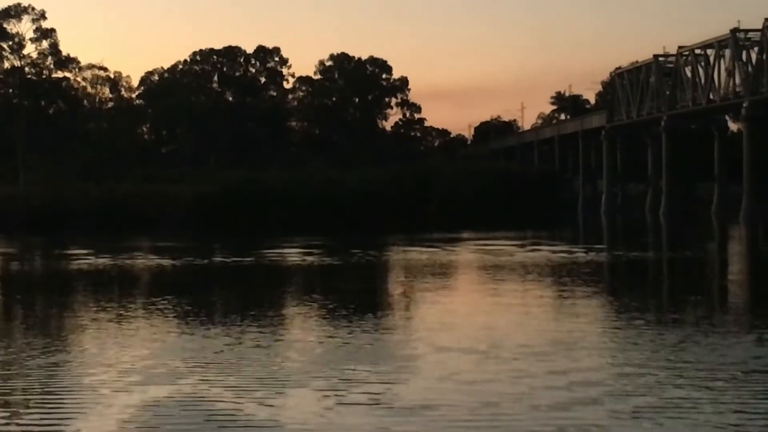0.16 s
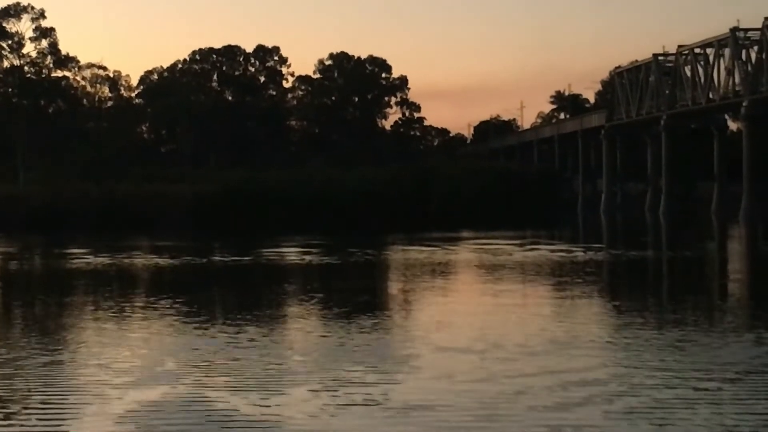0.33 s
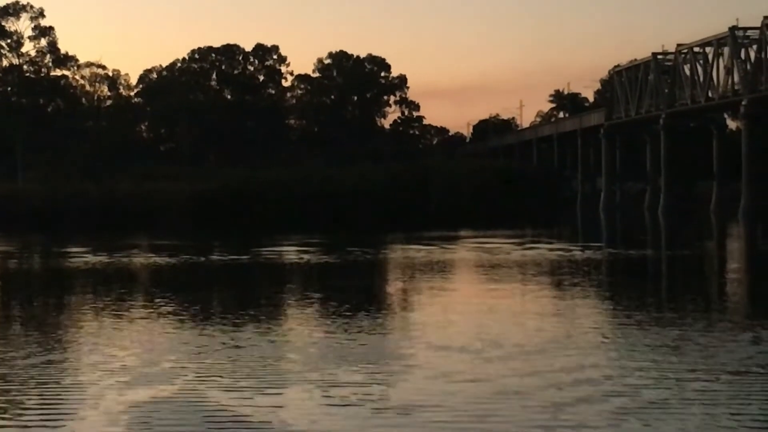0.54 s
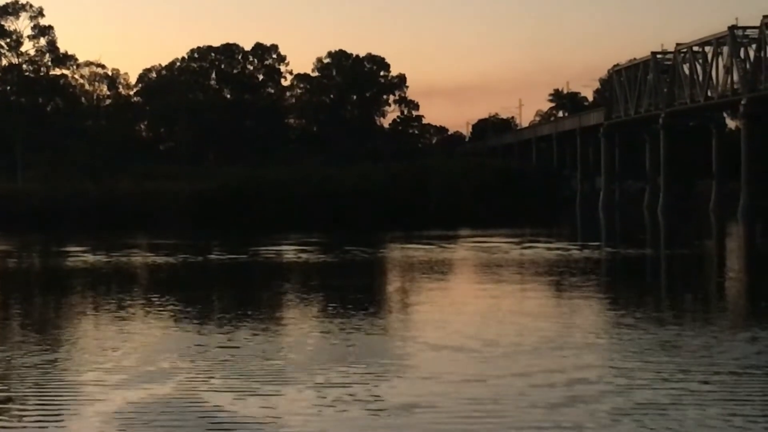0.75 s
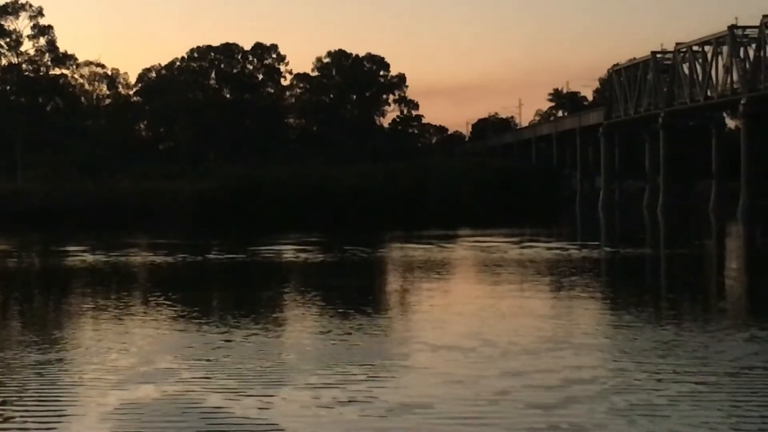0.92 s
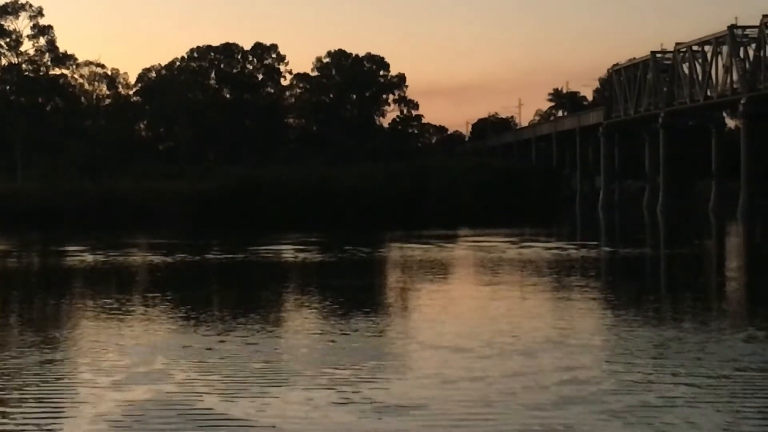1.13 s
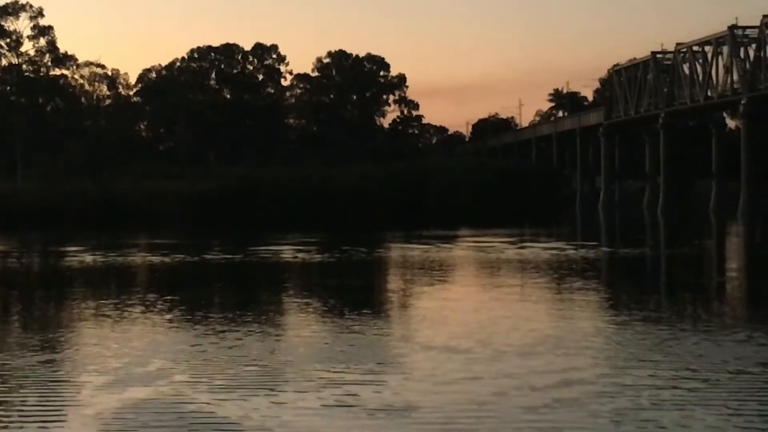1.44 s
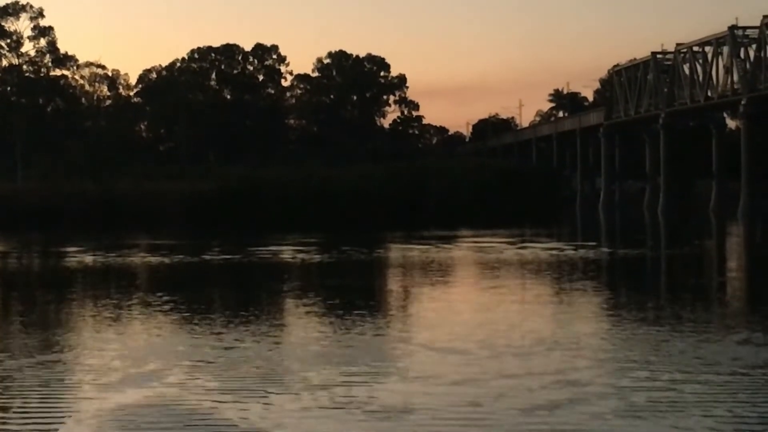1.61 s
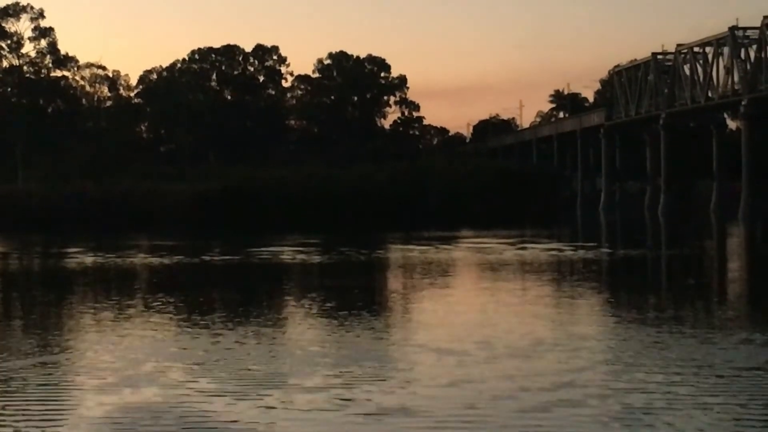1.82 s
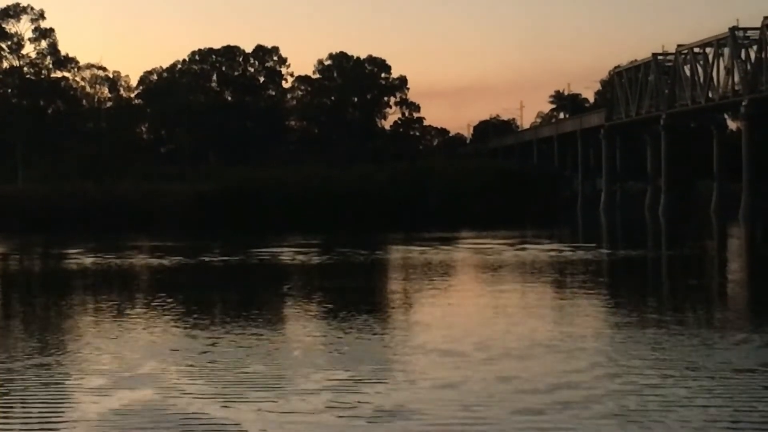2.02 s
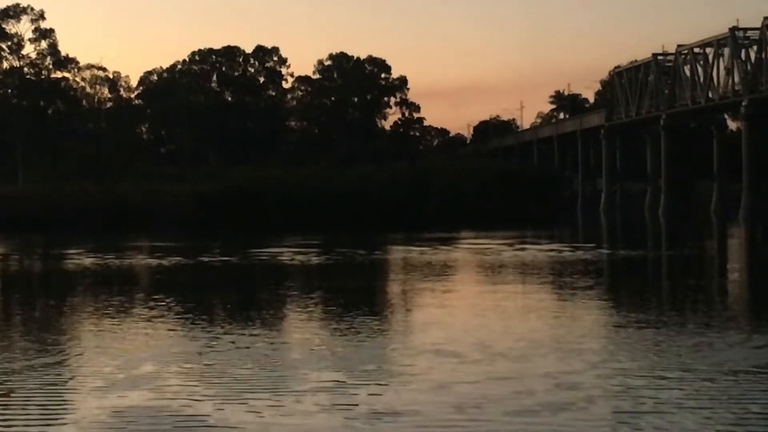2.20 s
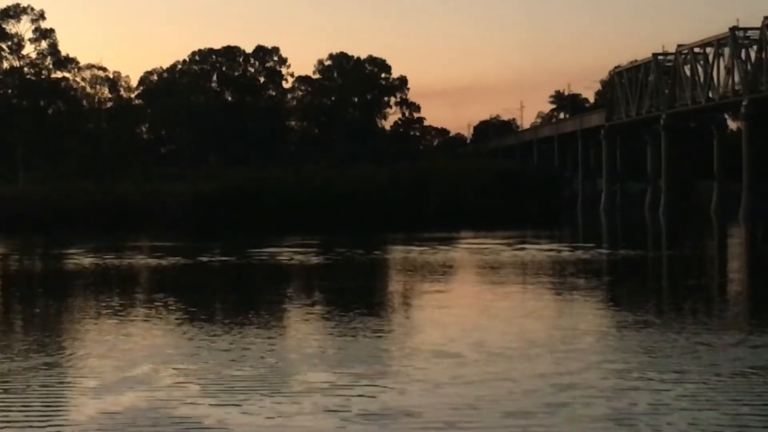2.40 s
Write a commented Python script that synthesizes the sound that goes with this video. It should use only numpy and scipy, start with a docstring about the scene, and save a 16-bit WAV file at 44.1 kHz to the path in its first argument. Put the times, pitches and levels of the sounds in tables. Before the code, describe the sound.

A flock of small parrots chatters and twitters in riverside trees over a low distant traffic rumble.

```python
"""Small parrots chatter in trees across a river at dusk: gliding chirps and a few harsh rasps, close up.
The nearer birds are whistled syllables with overtones; each chirp has a quick reflection.
Farther back the rest of the roost blurs: many random chirps mixed with their own echoes.
The trees scatter every call as decaying, dulled noise echoes.
Underneath, distant traffic is shaped noise with a wavering engine drone and two brief low swells."""
import sys
import numpy as np
from scipy import signal
from scipy.fft import rfft, irfft
from scipy.io import wavfile

SR = 44100
rng = np.random.default_rng(int(sys.argv[2]) if len(sys.argv) > 2 else 0)


def inscribe(sig):
    """Save sig as 16-bit PCM at rate SR to the path in sys.argv[1].

    A 1-D sig is mono; a 2-D sig holds one channel per row.
    Samples are clipped to [-1, 1] before scaling.
    """
    pcm = np.round(np.clip(np.atleast_2d(sig).T, -1, 1) * 32767)
    wavfile.write(sys.argv[1], SR, pcm.astype(np.int16))


N = 112454  # samples, about 2.55 s

# Near chirps: start t/s, length t/s, pitch f/Hz at the start, one third, two thirds and the end,
# then level/dB of each strong harmonic from the first up, before CHIRP_DB
NEAR_CHIRPS = [(.110, .034, 3750, 4200, 4250, 4150, -53.5), (.120, .048, 4550, 4750, 4830, 4700, -55.5),
               (.158, .024, 2780, 2850, 2970, 3060, -56, -56.5, -69),
               (.180, .040, 4750, 4830, 4700, 4550, -57.5),
               (.186, .044, 3290, 3400, 3410, 3380, -51.5, -62.5, -74),
               (.231, .058, 3450, 3740, 3800, 3850, -50.5, -68, -74),
               (.281, .030, 4720, 4650, 4610, 4580, -52, -69), (.376, .026, 4650, 4520, 4470, 4420, -56.5),
               (.411, .068, 1680, 1680, 1640, 1650, -66, -64, -66, -69),
               (.485, .028, 3650, 3750, 3800, 3830, -54.5, -74),
               (.510, .017, 3450, 3370, 3310, 3330, -56, -63), (.525, .025, 4600, 4430, 4300, 4180, -51),
               (.605, .098, 2910, 2950, 2930, 3200, -61.5, -67),
               (.644, .054, 4520, 4150, 3830, 3980, -55.5), (.696, .030, 4150, 4500, 4510, 4250, -51),
               (.722, .060, 3720, 3470, 3480, 3850, -60, -76), (1.019, .028, 4230, 4400, 4350, 4150, -52),
               (1.036, .030, 3250, 3250, 3130, 2900, -58, -69),
               (1.051, .030, 4200, 4150, 4060, 4150, -50.5), (1.078, .030, 4200, 4400, 4370, 4150, -52),
               (1.100, .028, 2670, 2730, 2770, 2780, -65, -61),
               (1.102, .076, 3450, 3430, 3480, 3560, -53.5, -72),
               (1.122, .047, 3130, 3140, 3080, 2850, -64, -60, -70),
               (1.151, .022, 4500, 4530, 4500, 4400, -53), (1.180, .070, 3220, 3300, 3380, 3650, -55, -68),
               (1.193, .073, 4520, 4310, 4440, 4550, -51), (1.265, .069, 3450, 3540, 3700, 3950, -54, -70),
               (1.350, .032, 2720, 2740, 2880, 3000, -66, -65),
               (1.381, .072, 3230, 3240, 3530, 3400, -54.5, -65.5),
               (1.438, .034, 3350, 3380, 3460, 3420, -57, -59.5),
               (1.472, .042, 3450, 3290, 3540, 3600, -55, -62), (1.508, .042, 4330, 4500, 4600, 4560, -57),
               (1.527, .040, 2550, 2750, 2950, 3050, -60, -68), (1.567, .026, 4500, 4330, 4270, 4200, -53),
               (1.568, .042, 2810, 2830, 2930, 2900, -62, -63.5),
               (1.598, .030, 3450, 3720, 3780, 3600, -57, -74),
               (1.625, .044, 3450, 2820, 2720, 3150, -62, -60),
               (1.667, .042, 3280, 3430, 3480, 3570, -55, -63.5),
               (1.707, .059, 3800, 3880, 3660, 4020, -52, -73),
               (1.712, .105, 2800, 3070, 3250, 3450, -60, -64), (1.760, .032, 4650, 4600, 4450, 4400, -52),
               (1.830, .020, 4450, 4430, 4380, 4300, -54), (1.878, .057, 3230, 3350, 3630, 3800, -61, -68),
               (1.901, .106, 2500, 2690, 2990, 3600, -62, -59.5),
               (2.007, .036, 3800, 3600, 3350, 3330, -53), (2.022, .055, 3280, 3350, 3450, 3480, -61, -70),
               (2.152, .040, 4750, 4520, 4330, 4200, -51), (2.152, .056, 3000, 3050, 3200, 3220, -60, -65),
               (2.174, .044, 3400, 3530, 3490, 3680, -54, -66), (2.196, .046, 4500, 4820, 4850, 4650, -53),
               (2.225, .058, 2520, 2560, 2850, 3280, -66, -62),
               (2.237, .032, 3550, 3520, 3510, 3550, -56, -63), (2.268, .028, 3850, 4020, 3980, 3900, -54),
               (2.287, .090, 3270, 3390, 3440, 3400, -57.5, -68),
               (2.379, .056, 3280, 3260, 3290, 3370, -56, -57), (2.405, .056, 3780, 3900, 3970, 3850, -55),
               (2.430, .066, 4520, 4760, 4780, 4680, -57.5),
               (2.445, .066, 3520, 3500, 3600, 3850, -56, -70)]
# Near rasps: start t/s, length t/s, first pitch f/Hz, last pitch f/Hz, level/dB, overtone level/dB if strong
NEAR_RASPS = [(.068, .052, 3100, 2950, -58, -65), (.135, .026, 3080, 3330, -60, -66),
              (.236, .028, 4750, 4650, -57), (.328, .062, 3400, 2800, -57, -65.5),
              (.948, .034, 4030, 4250, -55), (.934, .05, 2710, 2835, -62, -70),
              (1.852, .042, 4000, 4450, -56), (2.085, .066, 2850, 2680, -61, -61),
              (2.143, .035, 3950, 4400, -54.5, -72), (2.331, .047, 4400, 4520, -55),
              (2.39, .04, 3080, 2960, -58, -62), (2.475, .042, 4420, 4330, -55)]
# Loudness course of the far flock: t/s, level/dB
FLOCK_COURSE = [(0, -57.5), (.2, -53), (.5, -55), (.82, -59.5), (.95, -57.5), (1.4, -58.5), (1.7, -52.5),
                (1.98, -57.5), (2.2, -51.5), (2.55, -56.5)]
# Change of a far call's overtone, fading toward the treble: overtone f/Hz, level/dB added to FLOCK_OVERTONE_DB
OVERTONE_FADE = [(6500, 6), (7600, -12), (9400, -12)]
# Spectrum shape of traffic rumble, open air and faint hiss: f/Hz, relative level/dB per Hz
AIR_SPECTRUM = [(15, -14), (35, -1), (80, -1), (110, -8), (220, -12), (300, -17), (480, -24), (900, -20),
                (1500, -24), (2100, -28), (4400, -29), (5200, -39), (7000, -45.5), (8000, -47),
                (15500, -50)]
# Wavering engine drone: f/Hz, level/dB
ENGINE_DRONE = [(76, -55.5), (139, -62.5), (210, -65)]
# Brief low swells in the rumble: centre t/s, width t/s, peak level/dB
LOW_SWELLS = [(1.045, 0.017, -48), (1.99, 0.054, -52.5)]

CHIRP_DB = 1.0  # gain on every near chirp
BOUNCE_DB, BOUNCE_S = -9, .0045  # first reflection of each chirp, from water or branches: level, mean delay
ATTACK_S, RELEASE_S = .008, .0079
OVERHANG_S = .002  # extra sound before and after a syllable's stated length
CHIRP_JITTER, CHIRP_JITTER_HZ = .008, 290  # random pitch unsteadiness (share of pitch) and its speed
RASP_JITTER, RASP_JITTER_HZ = .052, 800  # the same, large and fast enough to sound harsh
WARBLE, WARBLE_HZ = .0048, 55.1  # regular pitch warble (share of pitch) and its rate
FLUTTER_DB, FLUTTER_HZ = 2.4, 150  # loudness unsteadiness and its speed
FAINT_DB = -29  # the next harmonic above a call's strong ones, relative to the last of them
WANDER_SIZE = 8192  # samples of random motion drawn per syllable, longer than any syllable

FLOCK_CALLS, FLOCK_CALL_S = 130, .043  # number of far calls and their mean length
FLOCK_HZ, FLOCK_SPREAD, FLOCK_GLIDE = 3470, .105, .05  # middle pitch; log-pitch spread of calls and glides
FLOCK_OVERTONE_DB, FLOCK_JITTER = -15.5, .016
FLOCK_RANGE_DB = 7.5  # the faintest far calls lie this much below the loudest
FLOCK_DIRECT = .75  # gain of direct sound beside echoes at gain 1
ECHO_DB, ECHO_T60_S, ECHO_DELAY_S, ECHO_CUT_HZ = -9.5, .4, .0061, 6500  # ECHO_DB is for near birds

AIR_DB = -47.5  # overall level of the shaped noise
DRONE_WIDTH_HZ = 8.4  # speed of the drone's wavering
SWELL_HZ = 205.6
EDGE_HZ = 15700


def near_birds():
    """Clear chirps and harsh rasps from the nearest trees, overlapping freely."""
    return near_chirps() + near_rasps()


def near_chirps():
    """Gliding whistles, each followed by a weaker copy that took a slightly longer path."""
    out = np.zeros(N)
    for start, length, a, b, c, d, *levels_db in NEAR_CHIRPS:
        chirp = amp(CHIRP_DB) * call(length, [a, b, c, d], levels_db, CHIRP_JITTER, CHIRP_JITTER_HZ)
        add(out, start - OVERHANG_S, chirp)
        bounce_delay = BOUNCE_S * (.5 + rng.random())
        add(out, start - OVERHANG_S + bounce_delay, amp(BOUNCE_DB) * chirp)
    return out


def near_rasps():
    """Straight glides whose fast, random pitch jitter roughens the whistle."""
    out = np.zeros(N)
    for start, length, first, last, *levels_db in NEAR_RASPS:
        rasp = call(length, [first, last], levels_db, RASP_JITTER, RASP_JITTER_HZ)
        add(out, start - OVERHANG_S, rasp)
    return out


def call(length, pitches, levels_db, jitter, jitter_hz):
    """One syllable: an unsteady whistle that glides through its pitches, with overtones."""
    t = np.arange(0, length + 2 * OVERHANG_S, 1 / SR)
    # A polynomial through the evenly spaced pitches gives a smooth glide
    glide = np.polyfit(np.linspace(0, 1, len(pitches)), pitches, len(pitches) - 1)
    hz = np.polyval(glide, np.clip((t - OVERHANG_S) / length, 0, 1))
    warble = WARBLE * np.sin(2 * np.pi * (WARBLE_HZ * t + rng.random()))
    unsteadiness = jitter * wander(jitter_hz, WANDER_SIZE)[:len(t)]
    phase = 2 * np.pi * np.cumsum(hz * (1 + warble + unsteadiness)) / SR

    ramp = np.clip(np.minimum(t / ATTACK_S, (t[-1] - t) / RELEASE_S), 0, 1)
    gate = np.sin(np.pi / 2 * ramp) ** 2
    flutter = unit(amp(FLUTTER_DB * wander(FLUTTER_HZ, WANDER_SIZE)[:len(t)]))

    harmonics_db = [*levels_db, levels_db[-1] + FAINT_DB]
    tone = sum(amp(db) * np.sin(k * phase) for k, db in enumerate(harmonics_db, start=1))
    return np.sqrt(2) * gate * flutter * tone  # sqrt(2) makes the levels rms


def trees(x):
    """Scattered echoes from trunks and leaves: a decaying noise tail, dulled in the treble."""
    t = np.arange(SR // 2) / SR
    decay = amp(-60 * t / ECHO_T60_S)
    onset = np.clip(t / ECHO_DELAY_S - 1, 0, 1)  # silent for one delay, full after two
    tail = rng.standard_normal(len(t)) * decay * onset
    wet = signal.fftconvolve(x, tail / np.linalg.norm(tail))[:N]
    return signal.sosfilt(signal.butter(2, ECHO_CUT_HZ, fs=SR, output="sos"), wet)


def far_flock():
    """Random chirps from deep in the roost, blurred by mixing them with their scattered echoes."""
    out = np.zeros(N)
    for k in range(FLOCK_CALLS):
        length_draw, time_draw, level_draw = rng.random(3)
        pitch_draw, *glide_draws = rng.standard_normal(5)
        centre = FLOCK_HZ * np.exp(FLOCK_SPREAD * np.clip(pitch_draw, -2, 2))
        pitches = centre * np.exp(FLOCK_GLIDE * np.array(glide_draws))
        levels_db = [0, FLOCK_OVERTONE_DB + read(OVERTONE_FADE, 2 * centre)]
        length = FLOCK_CALL_S * (.5 + length_draw)
        chirp = call(length, pitches, levels_db, FLOCK_JITTER, RASP_JITTER_HZ)
        # One call falls in each equal slot, the first slots reaching back before the start
        start = (k + time_draw) / FLOCK_CALLS * (N / SR + FLOCK_CALL_S) - FLOCK_CALL_S
        add(out, start, amp(-FLOCK_RANGE_DB * level_draw) * chirp)
    blurred = unit(FLOCK_DIRECT * out + trees(out))
    return blurred * amp(np.interp(np.arange(N) / SR, *np.transpose(FLOCK_COURSE)))


def traffic():
    """Distant traffic: steady rumble and hiss, a wavering drone and brief low swells."""
    return rumble() + engine_drone() + low_swells()


def rumble():
    """White noise shaped to the spectrum of far traffic, open air and faint hiss."""
    hz = np.fft.rfftfreq(N, 1 / SR)
    noise = irfft(rfft(rng.standard_normal(N)) * amp(read(AIR_SPECTRUM, hz)), N)
    return amp(AIR_DB) * unit(noise)


def engine_drone():
    """Narrow bands of hum whose strength and phase drift at random."""
    t, out = np.arange(N) / SR, np.zeros(N)
    for f, db in ENGINE_DRONE:
        waver = wander(DRONE_WIDTH_HZ, N) + 1j * wander(DRONE_WIDTH_HZ, N)
        out += amp(db) * (waver * np.exp(2j * np.pi * f * t)).real
    return out


def low_swells():
    """A phase-wandering hum that rises and falls in bell-shaped swells."""
    t = np.arange(N) / SR
    hum = unit(np.sin(2 * np.pi * SWELL_HZ * t + wander(DRONE_WIDTH_HZ, N)))
    return hum * sum(amp(db) * np.exp(-((t - s) / width) ** 2) for s, width, db in LOW_SWELLS)


def amp(db):
    """Decibels to gain."""
    return 10 ** (np.asarray(db) / 20)


def unit(x):
    """Scales to rms 1."""
    return x / np.sqrt(np.mean(abs(x) ** 2) + 1e-20)


def read(points, hz):
    """Reads a spectrum on a log-frequency axis."""
    f, value = np.transpose(points)
    return np.interp(np.log(hz + 1), np.log(f + 1), value)


def add(mix, s, sound):
    """Mixes a sound in at a time in seconds, trimming what lies outside the mix."""
    at = round(s * SR)
    sound = sound[max(-at, 0):]
    part = mix[max(at, 0):][:len(sound)]
    part += sound[:len(part)]


def wander(rate_hz, size):
    """Smooth random motion of rms 1: noise whose spectrum fades out around a rate."""
    hz = np.fft.rfftfreq(size, 1 / SR)
    return unit(irfft(rfft(rng.standard_normal(size)) * np.exp(-(hz / rate_hz) ** 2), size))


def scene():
    """Near birds with their echoes, the far flock behind and the traffic in the distance."""
    birds = near_birds()
    echoes = amp(ECHO_DB) * trees(birds)
    return (birds + echoes + far_flock() + traffic())[None]


def record(dry):
    """The recorder's band limit: a steep low-pass filter."""
    lowpass = signal.firwin(511, EDGE_HZ, window=("kaiser", 9), fs=SR)
    return signal.oaconvolve(dry, lowpass[None], "same")


dry = scene()
out = record(dry)
inscribe(out)
```